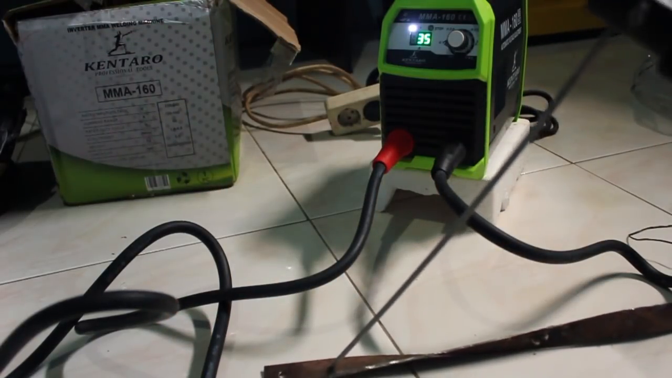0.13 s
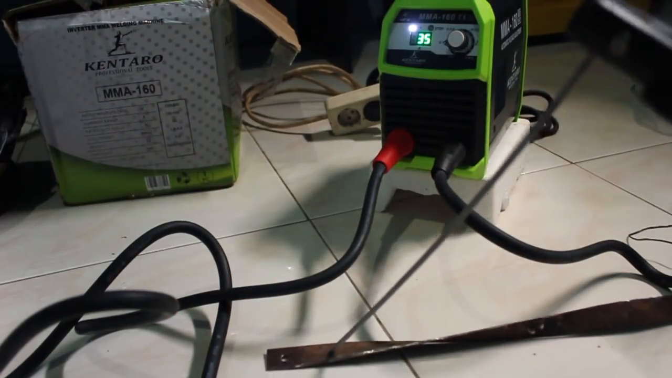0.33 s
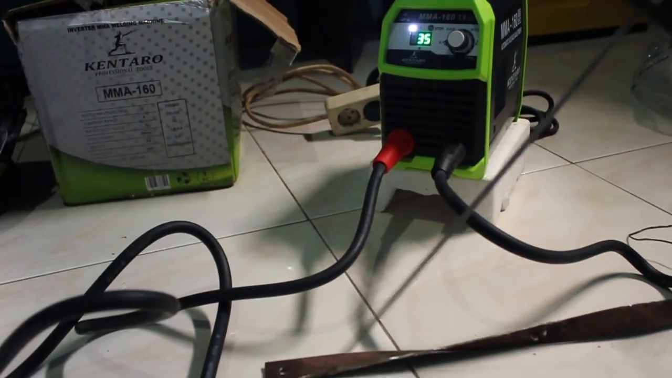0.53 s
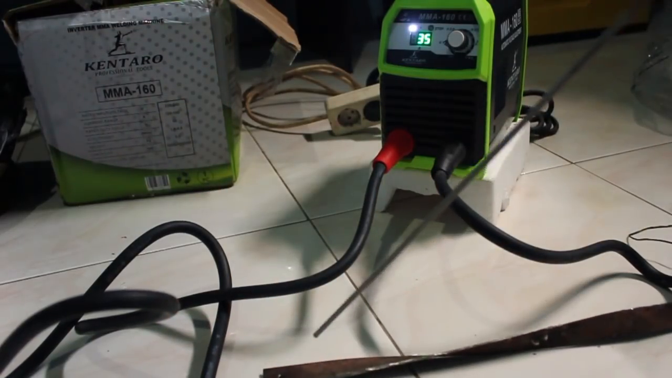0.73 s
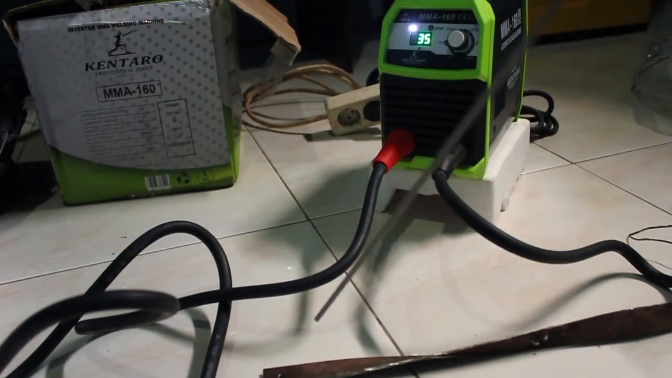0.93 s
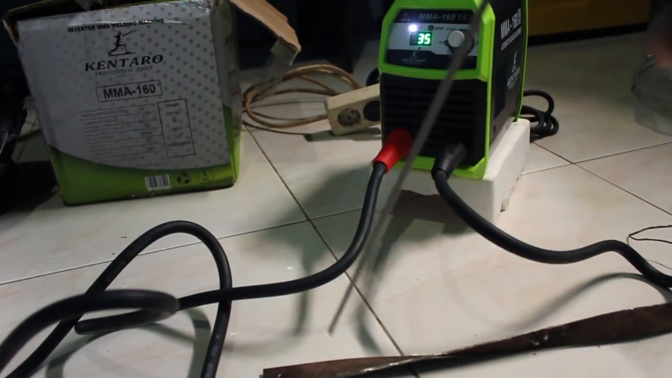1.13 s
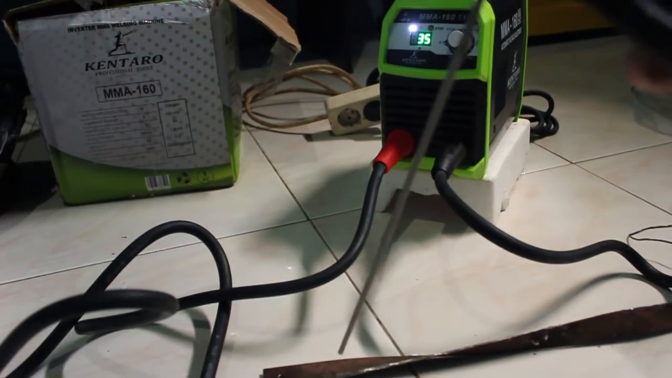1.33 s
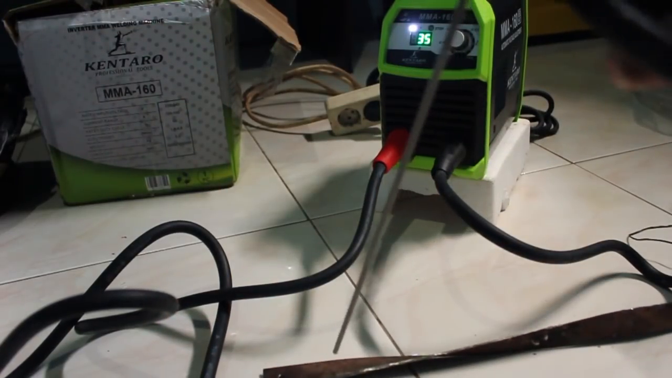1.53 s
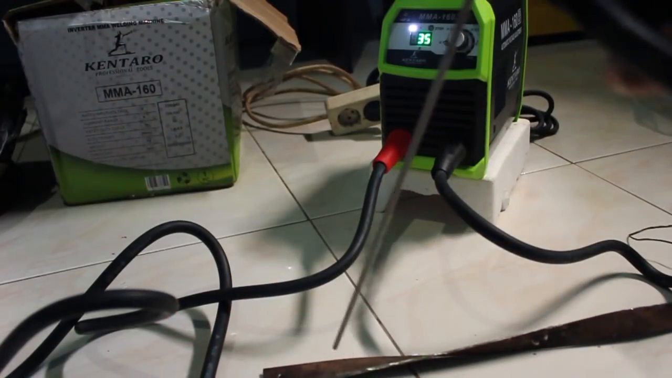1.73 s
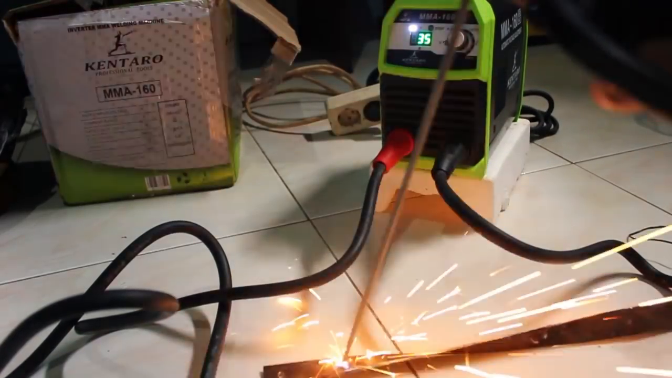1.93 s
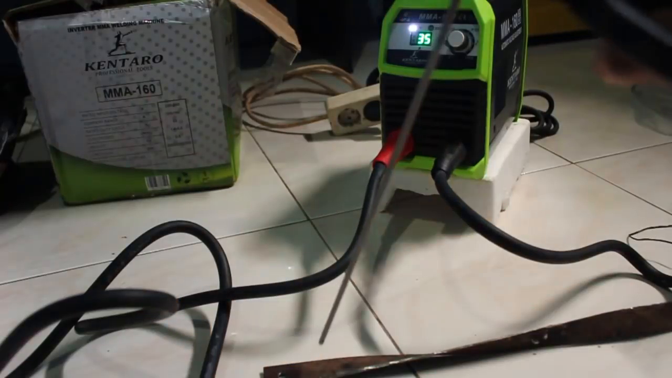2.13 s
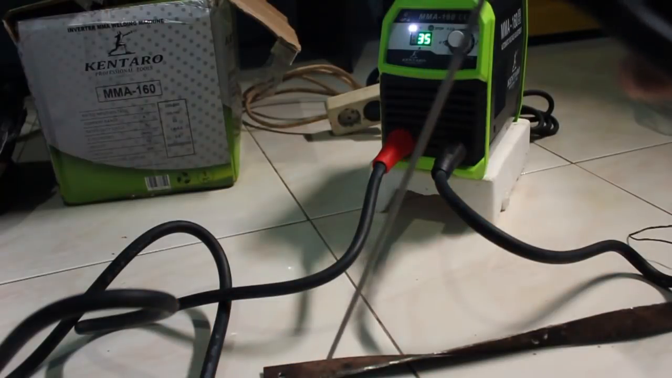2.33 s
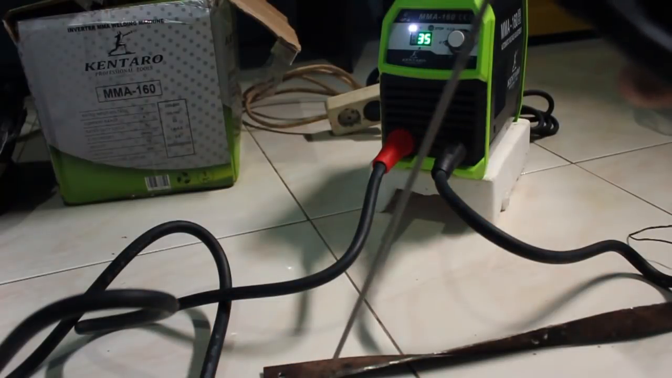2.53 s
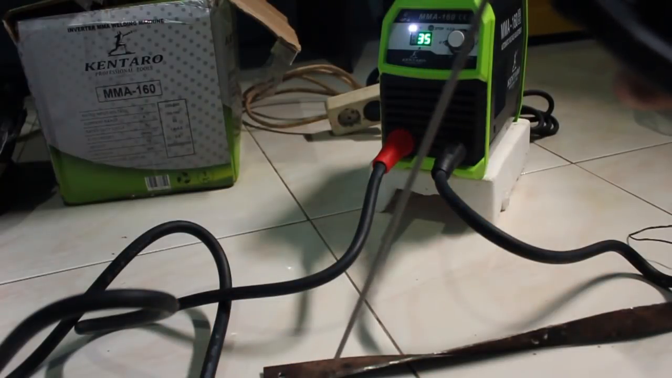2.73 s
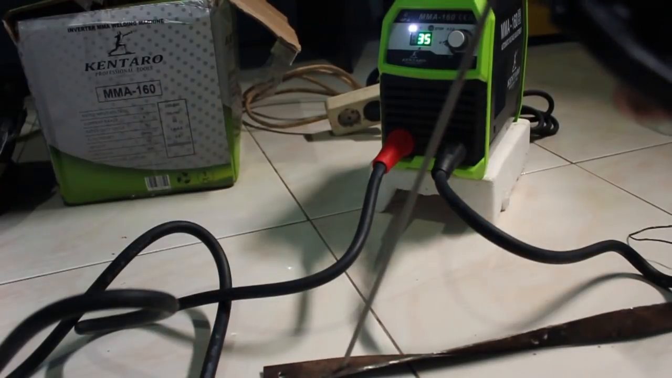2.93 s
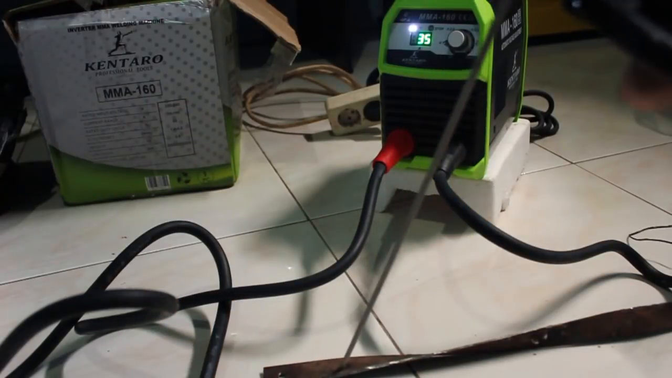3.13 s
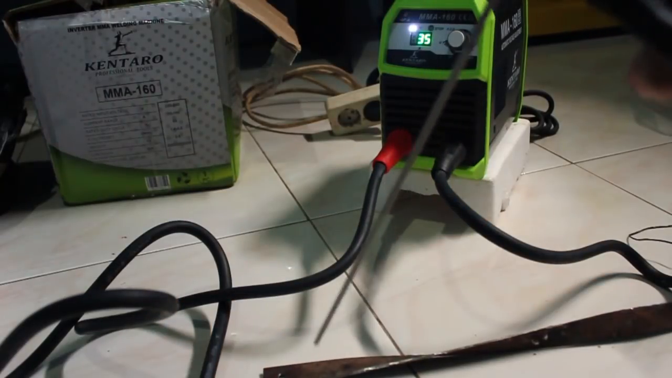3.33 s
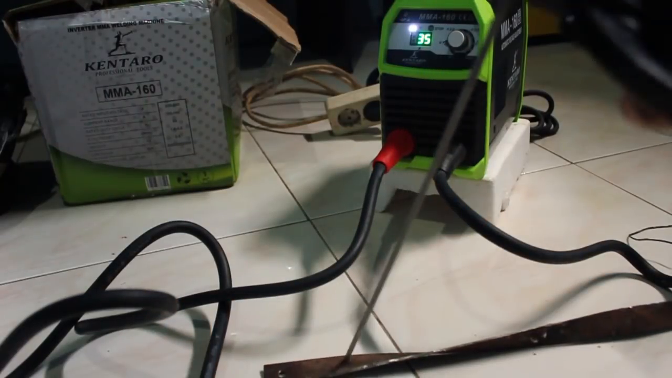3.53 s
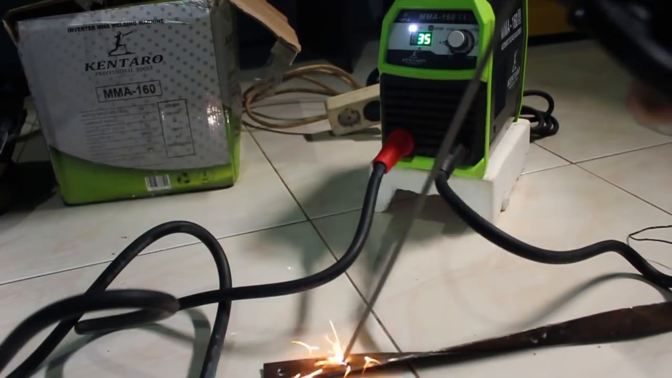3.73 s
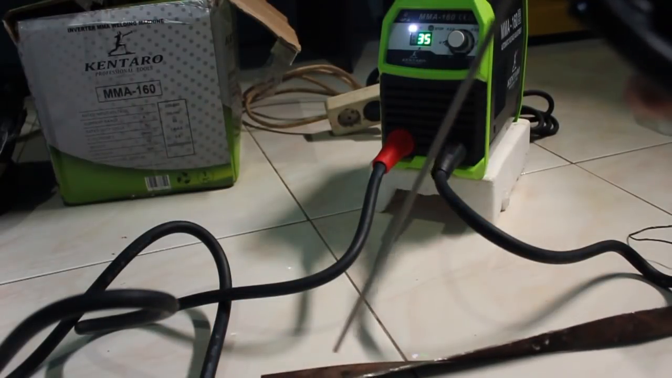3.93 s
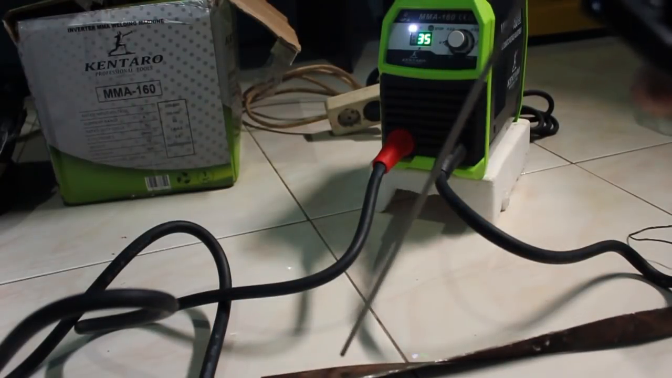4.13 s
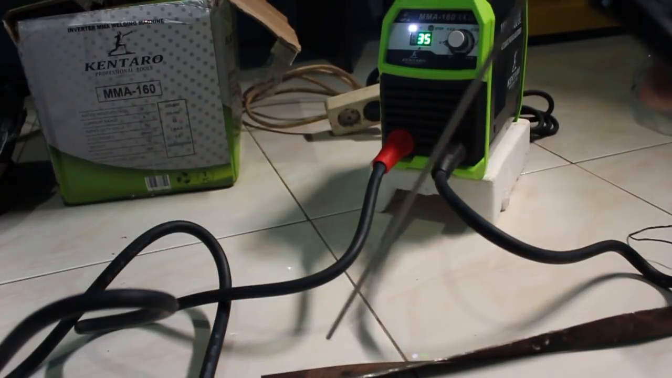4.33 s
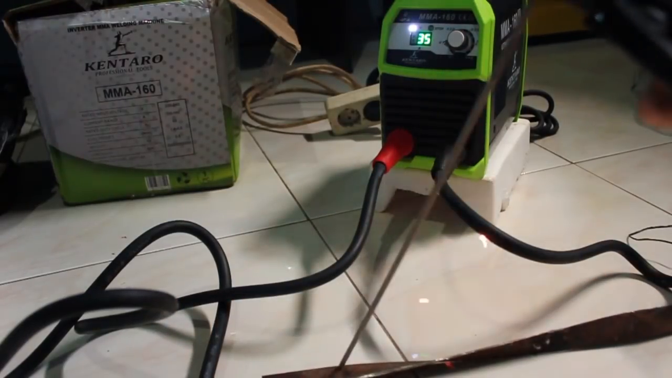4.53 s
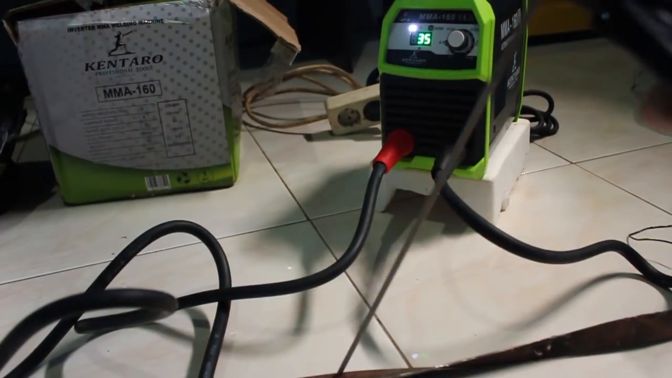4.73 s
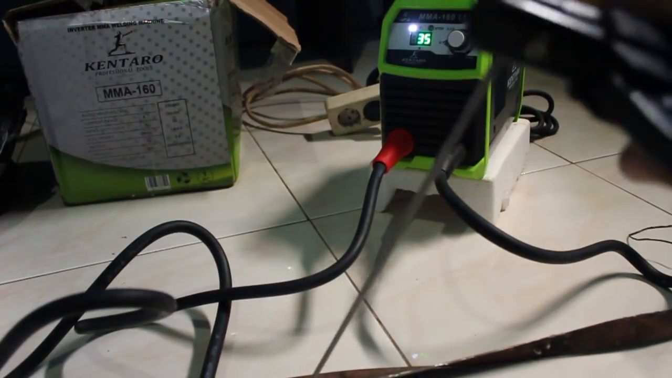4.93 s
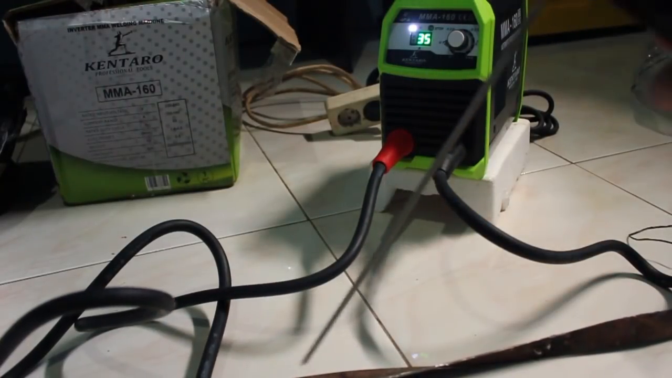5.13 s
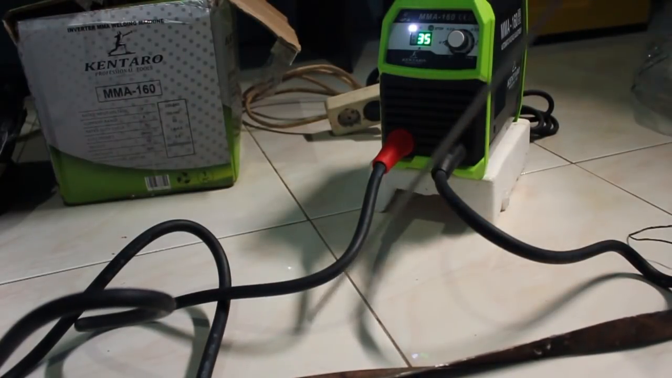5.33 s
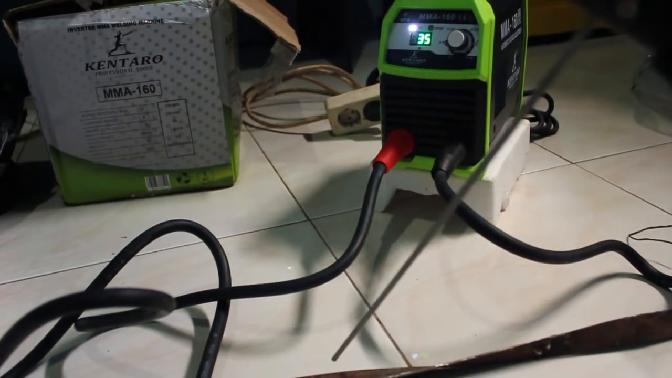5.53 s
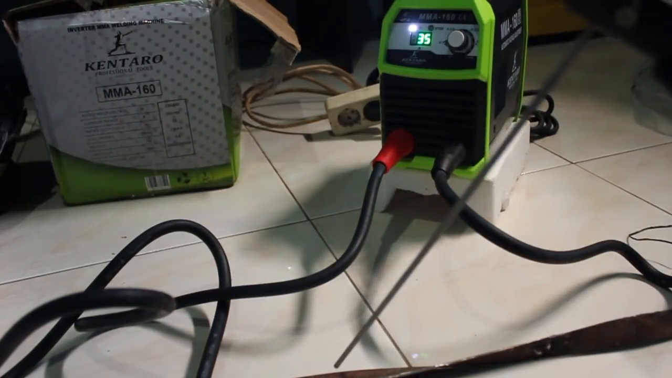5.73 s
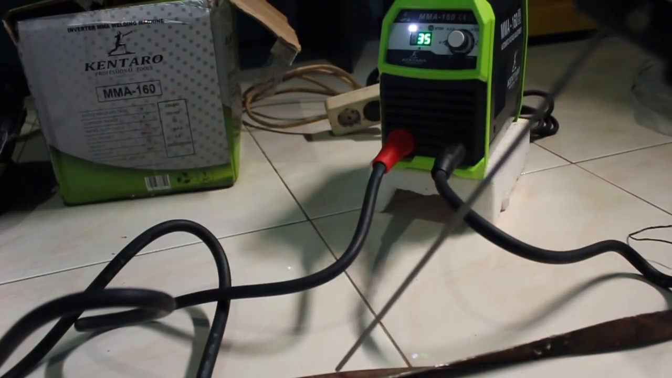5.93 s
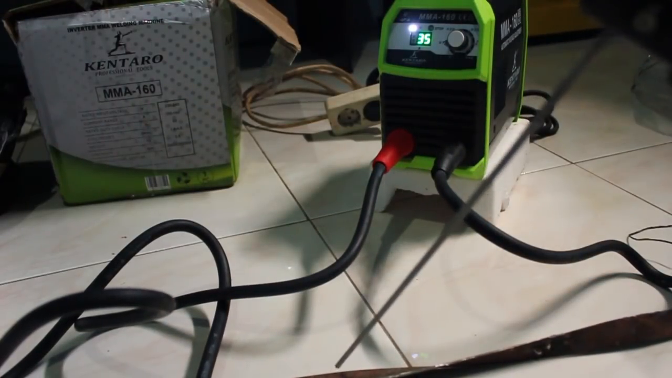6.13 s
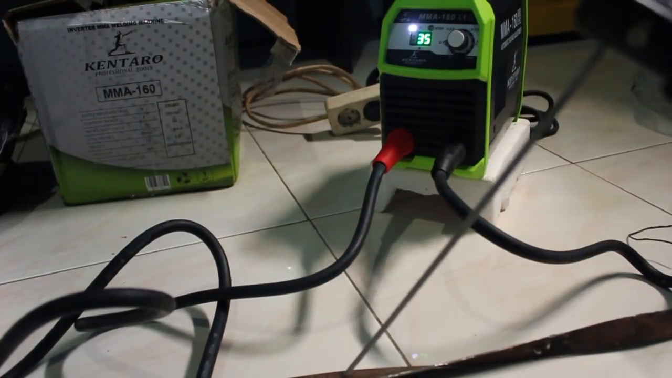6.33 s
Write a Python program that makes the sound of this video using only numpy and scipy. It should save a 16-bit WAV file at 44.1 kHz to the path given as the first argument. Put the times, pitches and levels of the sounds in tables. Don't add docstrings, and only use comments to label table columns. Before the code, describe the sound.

A small welder's fan whines and hisses steadily while a rod taps ringing steel, and two arc strikes crack violently with sizzling spatter.

```python
import sys
import numpy as np
from scipy import signal
from scipy.fft import rfft, irfft
from scipy.io import wavfile

SR = 44100
rng = np.random.default_rng(int(sys.argv[2]) if len(sys.argv) > 2 else 0)


def file_out(sig):
    cols = np.atleast_2d(sig).T
    lim = np.clip(cols, -1, 1)
    pcm = np.round(lim * 32767).astype(np.int16)
    wavfile.write(sys.argv[1], SR, pcm)


def natural_amplitude(level_db):
    exponent = np.asarray(level_db, float) / 20
    return 10 ** exponent


N = 284886


def rms_one(x):
    return x / np.sqrt(np.mean(x ** 2) + 1e-20)


def drift(rate_hz):
    r = np.exp(-80 * np.pi * rate_hz / SR)
    slow = signal.lfilter([1], [1, -2 * r, r * r], rng.standard_normal(N // 40 + 2002))[2000:]
    return np.interp(np.arange(N) / 40, np.arange(len(slow)), rms_one(slow))


def ring(x, hz, t60_s):
    r = natural_amplitude(-60 / (t60_s * SR))
    w = 2 * np.pi * hz / SR
    return signal.lfilter([0, np.sin(w)], [1, -2 * r * np.cos(w), r * r], x + 1e-18)


def band(x, low_hz, high_hz):
    edges_hz = np.clip([low_hz, max(high_hz, 1.2 * low_hz)], 10, .45 * SR)
    return signal.sosfilt(signal.butter(2, edges_hz, "band", fs=SR, output="sos"), x)


def grains(count, share, spread_db):
    sizes = natural_amplitude(spread_db * np.minimum(rng.exponential(1, count), 4))
    signs = rng.choice([-1, 1], count)
    return rms_one(sizes * signs * (rng.random(count) < share))


def swell_db(start_s, hold_s, attack_db_per_s, release_db_per_s):
    since_s = np.arange(N) / SR - start_s
    return attack_db_per_s * np.minimum(since_s, 0) - release_db_per_s * np.maximum(since_s - hold_s, 0)


# start_s, peak_db, low_hz, high_hz
CRACKS = [(1.8733, -4, 3000, 18000), (1.8757, 0.5, 4000, 12000), (1.8838, -2, 900, 4960),
          (1.8888, -12, 900, 5000), (1.8942, -13, 1500, 7000), (1.8984, 6.5, 890, 11700),
          (1.9045, -5, 1000, 9000), (1.9066, -3, 6000, 18000), (1.913, -10, 7000, 18000),
          (1.9555, -14, 7000, 18000), (1.9586, -7, 3000, 18000), (1.9604, -2, 2000, 17800),
          (1.9668, -11, 4000, 18000), (3.5017, 1, 1500, 18000), (3.7575, -6, 910, 2600),
          (3.7582, 1, 900, 18000), (3.7784, -2, 1200, 12000), (3.884, -20, 9000, 18000),
          (4.4643, -5, 1500, 18000), (4.4655, -1.5, 1800, 18000), (4.4695, -1, 1500, 18000),
          (4.4743, 4, 3000, 18000), (4.4826, -6, 2500, 16000), (4.494, 6.5, 880, 7000),
          (4.5023, -3, 1500, 18000), (4.7933, -7, 10500, 18000), (4.7942, -4, 12500, 18000),
          (4.7958, -10, 12500, 18000), (4.803, -20, 9000, 17800)]
# start_s, peak_db, tilt_db_per_octave
STRIKES = [
    (1.8757, 2, 1.2),
    (4.4674, -3, 0),
]
# low_hz, high_hz, level_db, t60_ms
BOOM = [(223, 820, -4.5, 29), (830, 1240, -2, 17), (1420, 1840, -1, 16), (2600, 3750, 3.5, 11)]
CRACK_T60_MS, CRACK_MS_PER_DB = 7.9, 0.96
FLOOR_ECHO_S, FLOOR_ECHO_DB = .0021, -4


def arc():
    out, t = np.zeros(N), np.arange(SR // 20) / SR
    bursts = []
    for s, db, low_hz, high_hz in CRACKS:
        bursts.append((s, db, low_hz, high_hz, max(CRACK_T60_MS + CRACK_MS_PER_DB * db, 3)))
    for s, db, tilt_db in STRIKES:
        for low_hz, high_hz, band_db, t60_ms in BOOM:
            boom_db = db + band_db + tilt_db * np.log2(low_hz / 1000)
            bursts.append((s, boom_db, low_hz, high_hz, t60_ms))
    for k, (s, db, low_hz, high_hz, t60_ms) in enumerate(bursts):
        spikes = grains(len(t), 0.15, 3.34)
        spikes[0] = 4.5 * (-1) ** k
        burst = band(spikes * natural_amplitude(-60000 * t / t60_ms), low_hz, high_hz)
        burst = burst + natural_amplitude(FLOOR_ECHO_DB) * np.roll(burst, round(FLOOR_ECHO_S * SR))
        at = round(s * SR)
        out[at:at + len(t)] += natural_amplitude(db - gain_db(s)) * burst / abs(burst).max()
    return out


# start_s, level_db_rms, fade_db_per_s, length_s
SIZZLE = [
    (1.868, -29.5, 25, 0.13),
    (3.518, -23.5, 73, 0.1),
    (3.764, -21, 136, 0.2),
    (4.472, -21.5, 93, 0.063),
]


def sizzle():
    clicks = grains(N, 0.43, 1.6) * natural_amplitude(1.8 * drift(90.0))
    spatter = rms_one(band(clicks, 1150, 11800))
    out, now_s = np.zeros(N), np.arange(N) / SR
    for s, db, fade_db_per_s, length_s in SIZZLE:
        life_db = swell_db(s, length_s, 6000, 300) - fade_db_per_s * np.maximum(now_s - s, 0)
        out += spatter * natural_amplitude(db + life_db - gain_db(now_s))
    return out


# centre_s, peak_db, width_ms
THUDS = [
    (1.8766, -25, 7.8),
    (1.879, -25, 1.1),
]


def thuds():
    t = np.arange(N) / SR
    return sum(natural_amplitude(db - gain_db(s)) * np.exp(-((t - s) * 4000 / width_ms) ** 2) for s, db, width_ms in THUDS)


# start_s, peak_db, low_favoured_hz, high_favoured_hz, rattle_db
TAPS = [(1.6475, -8, 5060, 11800, 9), (2.9145, -12.5, 2960, 8600, 1), (3.0464, -28, 4600, 8740, 1.0),
        (3.5004, -3.5, 2980, 11500, 2), (3.5344, -11.5, 4950, 7330, 5), (3.7567, -6, 2960, 8700, 9),
        (3.7854, -19, 4960, 11200, 17), (3.8928, -4.5, 3380, 10200, 9), (4.203, -7, 5920, 10500, 7.5),
        (4.9134, -22.5, 3200, 7400, 7), (5.019, -18.5, 4800, 7330, 7), (6.2366, -9.5, 3080, 7410, 8),
        (6.268, -16.5, 4630, 8880, 8)]
# pitch_hz, level_db, t60_s
BAR = [(2960, -3, .06), (3380, -8, .25), (4660, -7, .2), (4950, 0, .18), (5190, -5, .06), (5930, -3, .08),
       (6240, -7, .18), (6880, -12, .15), (7335, -9, .2), (7420, -6, .1), (8190, -12, .2), (8730, -4, .1),
       (8880, -7, .22), (9400, -6, .15), (9780, -8, .08), (10170, -3, .16), (10480, -6, .08),
       (10680, -5, .2), (11180, -5, .2), (11340, -6, .1), (11660, -5, .12), (11820, -10, .12),
       (12300, -9, .15), (12590, -8, .28), (12720, -10, .2), (13200, -11, .18), (13850, -7, .25),
       (14270, -8, .2), (14870, -9, .16), (15400, -16, .1)]
CHATTER_MS, GRIP = 4.5, .92
TAP_TILT_DB = -0.56


def bar_modes(contact, low_hz, high_hz):
    luck_db, body = rng.normal(0, 2.0, len(BAR)), 0
    for (hz, level_db, t60_s), chance_db in zip(BAR, luck_db):
        push = contact * rng.standard_normal(len(contact))
        mode = ring(push, hz, GRIP * t60_s)
        mode = mode + .7 * ring(push, hz * rng.uniform(.99, 1.01), GRIP * t60_s / 2)
        favour_db = sum(boost_db * np.exp(-(np.log(hz / favoured_hz) / .02) ** 2)
                        for favoured_hz, boost_db in ((low_hz, 10), (high_hz, 5)))
        mode_db = level_db + chance_db + favour_db + TAP_TILT_DB * np.log2(hz / 8000)
        body = body + natural_amplitude(mode_db) * mode / abs(mode).max()
    return body / abs(body).max()


def taps():
    out, t = np.zeros(N), np.arange(SR // 3) / SR
    contact = np.exp(-t * 1000 / CHATTER_MS) * np.clip(t / .0012, 0, 1)
    for s, db, low_hz, high_hz, rattle_db in TAPS:
        body = bar_modes(contact, low_hz, high_hz)
        rattle = grains(len(t), 1.0, 2.0) * (contact + 0.35 * natural_amplitude(-60 * t / 0.42))
        dull, bright = band(rattle, 1900, 7000), band(rattle, 8300, 14500)
        rattle = natural_amplitude(-TAP_TILT_DB) * dull + natural_amplitude(TAP_TILT_DB) * bright
        hit = body + 0.22 * natural_amplitude(rattle_db) * rattle
        at = round(s * SR)
        out[at:at + len(t)] += (natural_amplitude(db - gain_db(s)) * hit)[:N - at]
    return band(out, 1500, 19000)


# multiple, level_db_rms, lag_s
SQUEAK = [(1, -28, -0.0057), (2, -28, -.015), (3, -36, -0.018), (4, -32, 0.0013), (6, -42, .001),
          (8, -39, -0.00089), (11, -50, .001)]
SQUEAK_S, SQUEAK_HZ, SQUEAK_WAVER_DB = .36, 918, 3


def squeak():
    phase = 2 * np.pi * np.cumsum(SQUEAK_HZ * (1 + .002 * drift(60.0))) / SR
    out = np.zeros(N)
    for k, db, lag_s in SQUEAK:
        life_db = swell_db(SQUEAK_S + lag_s, .03, 450, 450)
        level_db = db + SQUEAK_WAVER_DB * drift(25.0) + life_db
        out += np.sqrt(2) * natural_amplitude(level_db) * np.sin(round(k) * phase)
    return out


# centre_hz, t60_s
ROOM = [(150, 1), (500, 0.63), (2000, 0.44), (6000, 0.41), (14000, 0.23)]
ROOM_DB, FAR_WALL_S, FAR_WALL_DB = -8, .028, 4.0


def room(x):
    t, tail = np.arange(SR) / SR, 0
    for hz, t60_s in ROOM:
        noise = rms_one(band(rng.standard_normal(SR), hz / 1.97, hz * 1.46))
        tail = tail + noise * np.sqrt(hz) * natural_amplitude(-60 * t / t60_s)
    wall_db = FAR_WALL_DB * np.exp(-((t - FAR_WALL_S) / .006) ** 2)
    tail = tail * np.clip(t / .004, 0, 1) * natural_amplitude(wall_db)
    return natural_amplitude(ROOM_DB) * signal.fftconvolve(x, tail / np.sqrt(np.sum(tail ** 2)))[:N]


FAN_ORDERS = [(.505, -69), (1, -63), (7, -27), (12, -46), (14, -44), (21, -48.5), (22.2, -48), (24, -44),
              (28, -40), (35, -75), (42, -41), (49, -46), (56, -52), (63, -56), (70, -63)]
TURNS_HZ = 99.2


def fan_tones(turn):
    out = np.zeros(N)
    for k, db in FAN_ORDERS:
        level_db = db + 0.17 * np.sqrt(k) * drift(11.4)
        out += np.sqrt(2) * natural_amplitude(level_db) * np.sin(k * turn + rng.uniform(0, 2 * np.pi))
    return out


# pitch_hz, density_db_per_hz
AIR = [(25, -56), (60, -39), (100, -25), (170, -34.5), (300, -11.5), (560, -13), (800, -15), (1100, -14),
       (2400, -15.5), (4500, -17.5), (6000, -21.5), (7500, -28.5), (11000, -32.5), (16000, -39)]
AIR_DB = -28


def air_rush(turn):
    air_hz, air_db = np.transpose(AIR)
    hz = np.maximum(np.arange(N // 2 + 1) * SR / N, 1)
    shaped = rfft(rng.standard_normal(N)) * natural_amplitude(np.interp(np.log(hz), np.log(air_hz), air_db))
    together, rush = drift(6.8), 0
    for octave in range(5, 15):
        share = np.clip(1 - abs(np.log2(hz) - octave), 0, 1)
        flicker_db = .5 * together + .6 * drift(14.0)
        rush = rush + irfft(shaped * share, N) * natural_amplitude(flicker_db)
    return natural_amplitude(AIR_DB) * rms_one(rush) * (1 + 0.014 * np.sin(2 * turn))


# pitch_hz, width_hz, level_db_rms
CASE = [(136.5, 21.4, -54), (222.2, 38.4, -43.5), (316, 36.7, -39), (456.8, 51.6, -33.5), (505.7, 29, -41),
        (605, 35, -43.5), (960, 29, -44), (2116, 150, -43)]


def case():
    out = np.zeros(N)
    for hz, width_hz, db in CASE:
        rush = band(rng.standard_normal(N), hz - width_hz, hz + width_hz)
        out += natural_amplitude(db + 0.77 * drift(6.3)) * rms_one(ring(rush, hz, 2.12 / width_hz))
    return out


def fan():
    turn = 2 * np.pi * np.cumsum(TURNS_HZ * (1 + .00015 * drift(2.0))) / SR
    return fan_tones(turn) + air_rush(turn) + case()


# start_s, depth_db
DUCKS = [
    (1.873, 12.5),
    (1.9, 9.5),
    (1.96, 14.5),
    (3.5, 2),
    (3.756, 4),
    (3.892, 4),
    (4.203, 0),
    (4.465, 11),
    (4.494, 23),
    (4.8, 0),
]
DUCK_ATTACK_S, DUCK_RELEASE_S, REST_DB = 0.0083, .17, -0.23


def gain_db(s):
    start_s, depth_db = np.transpose(DUCKS)
    since_s = np.maximum(np.asarray(s)[..., None] - start_s, 0)
    duck = np.exp(-since_s / DUCK_RELEASE_S) - np.exp(-since_s / DUCK_ATTACK_S)
    return REST_DB - duck @ depth_db


def scene():
    near = arc() + sizzle() + taps()
    mono = near + room(near) + thuds() + squeak() + fan()
    return np.array([mono, mono])


def roll_off(x):
    return signal.sosfilt(signal.butter(12, 16420, fs=SR, output="sos"), x)


def record(dry):
    level = dry * natural_amplitude(gain_db(np.arange(N) / SR))
    level = signal.sosfilt(signal.ellip(8, .5, 26, 15800, fs=SR, output="sos"), level)
    mix = np.clip(level, -.98, .98)
    return roll_off(mix)


dry = scene()
out = record(dry)
file_out(out)
```